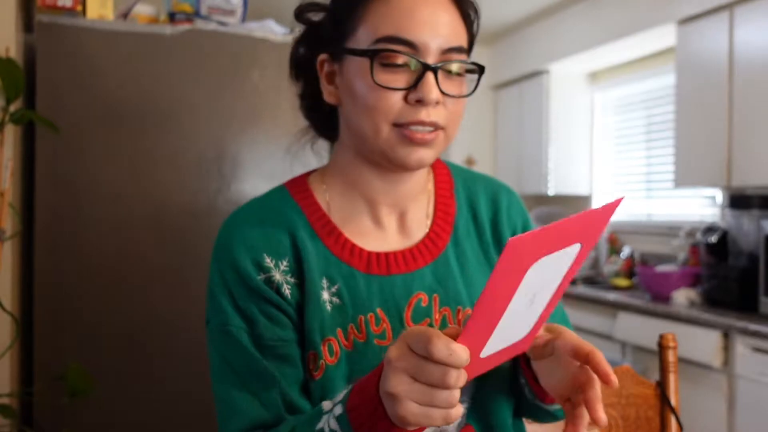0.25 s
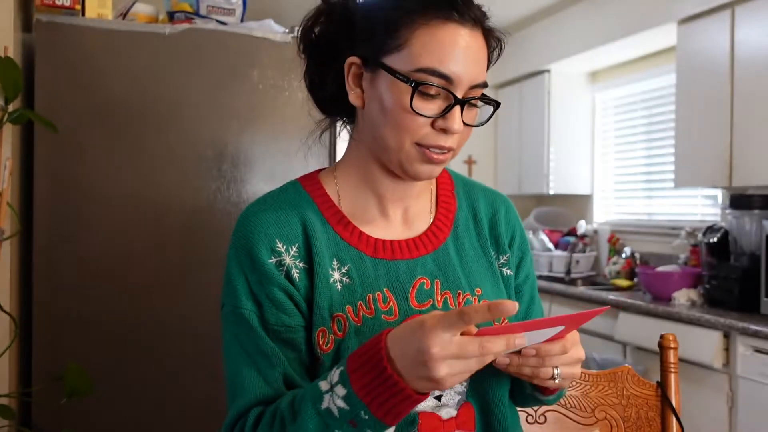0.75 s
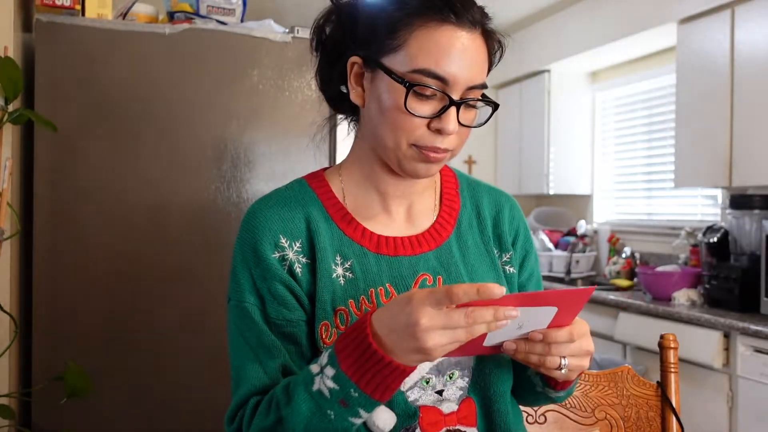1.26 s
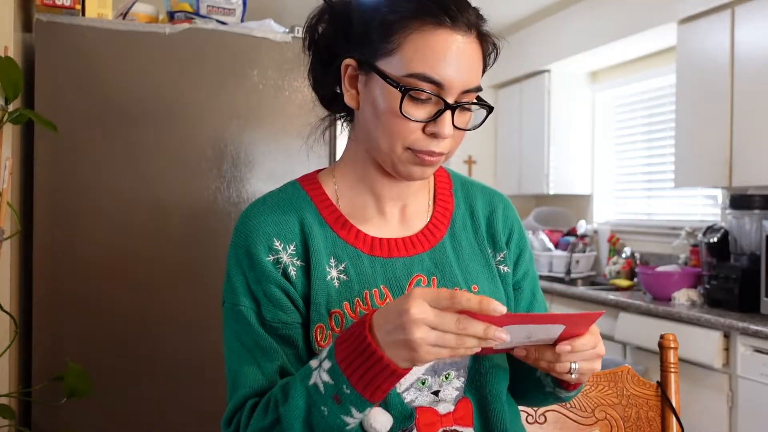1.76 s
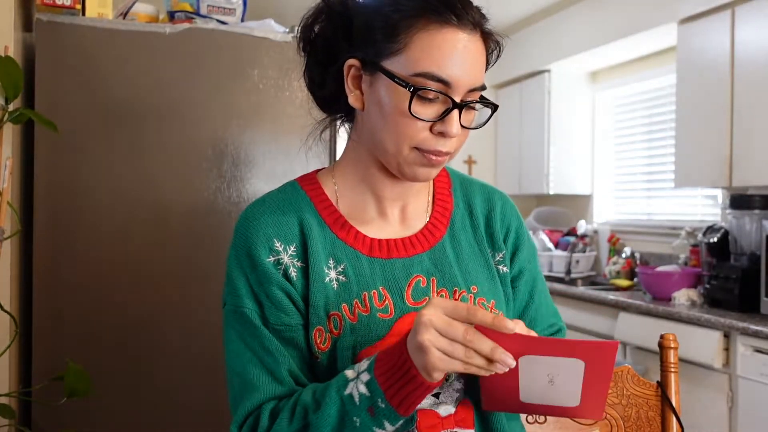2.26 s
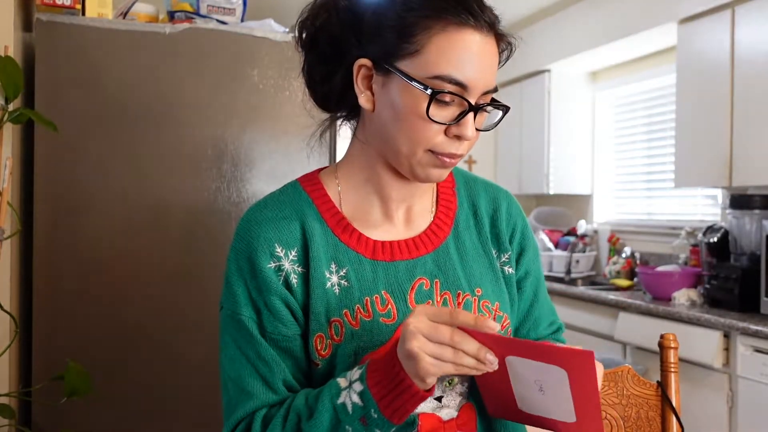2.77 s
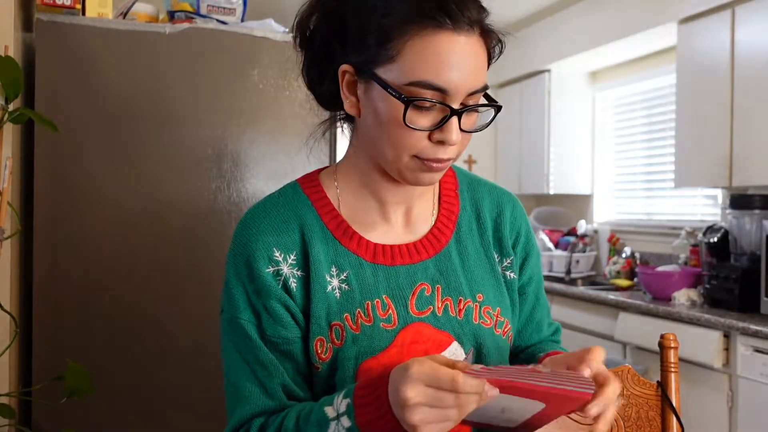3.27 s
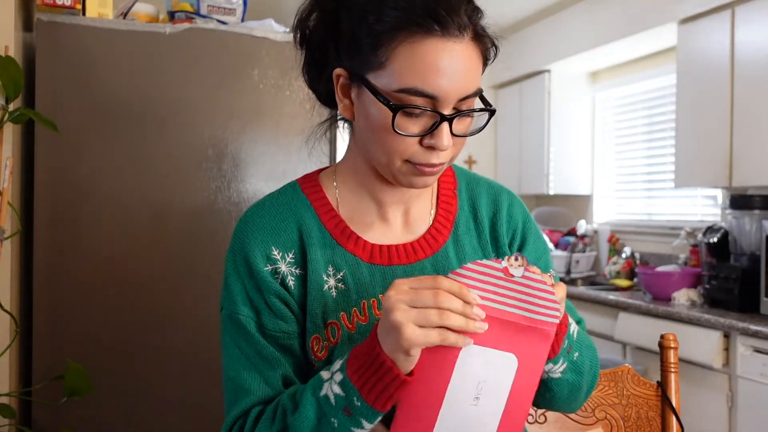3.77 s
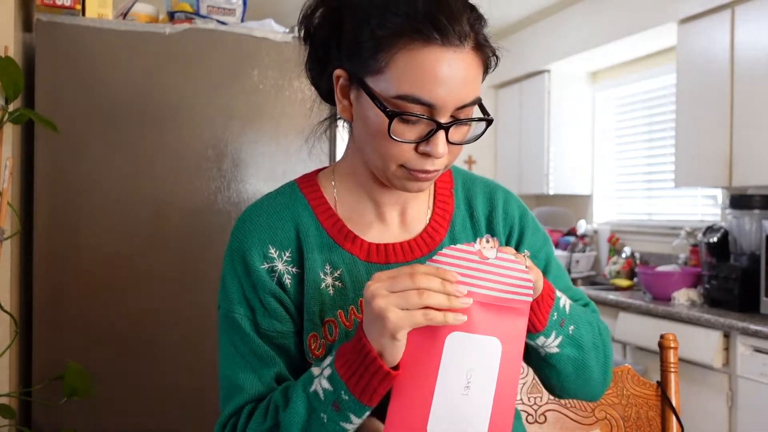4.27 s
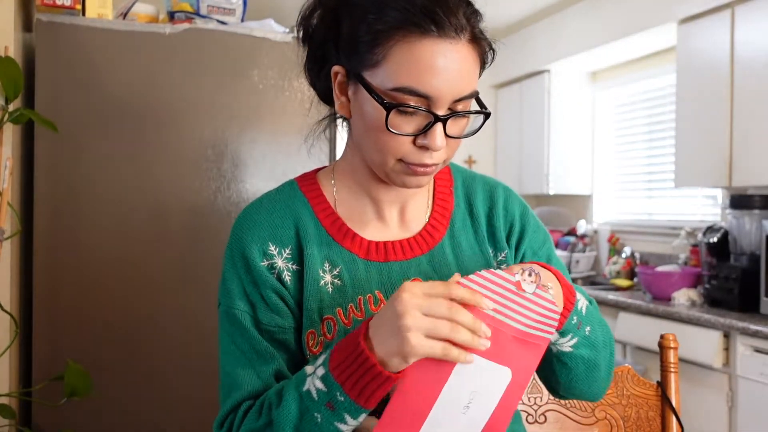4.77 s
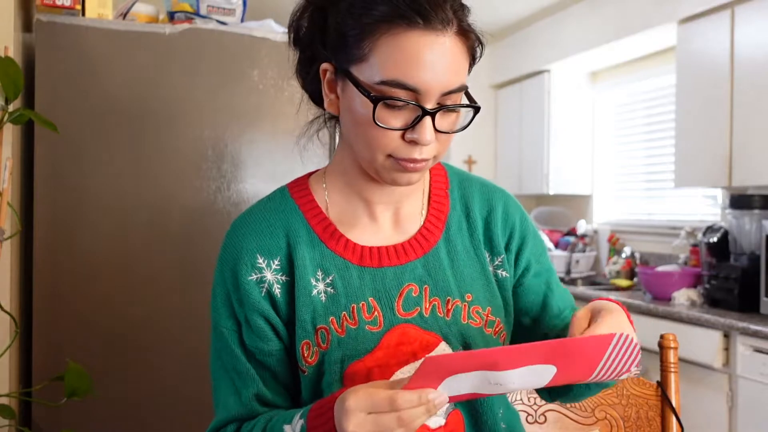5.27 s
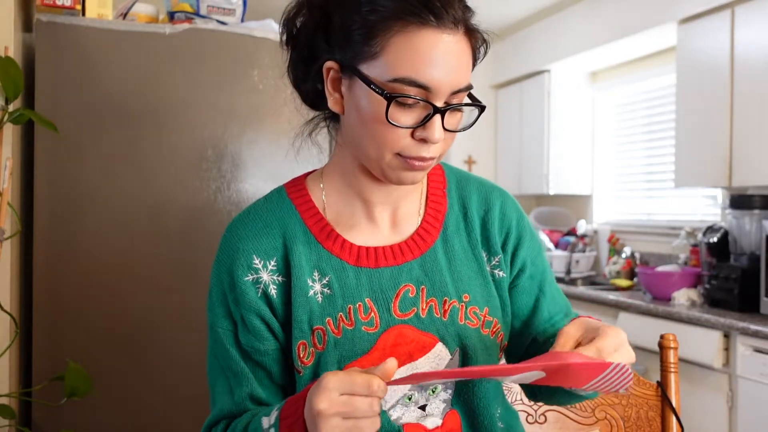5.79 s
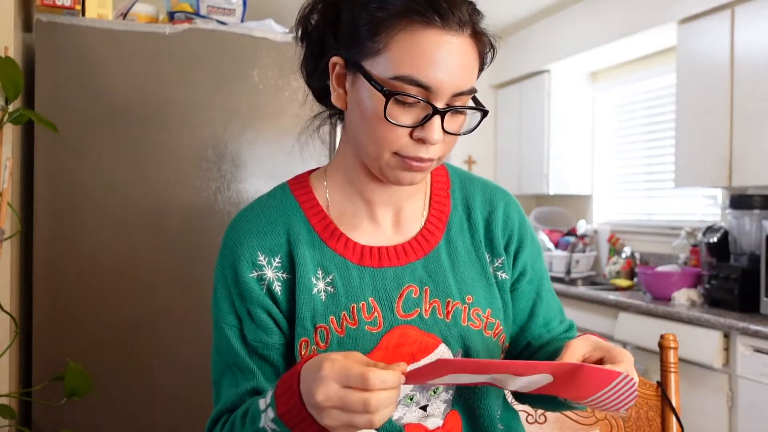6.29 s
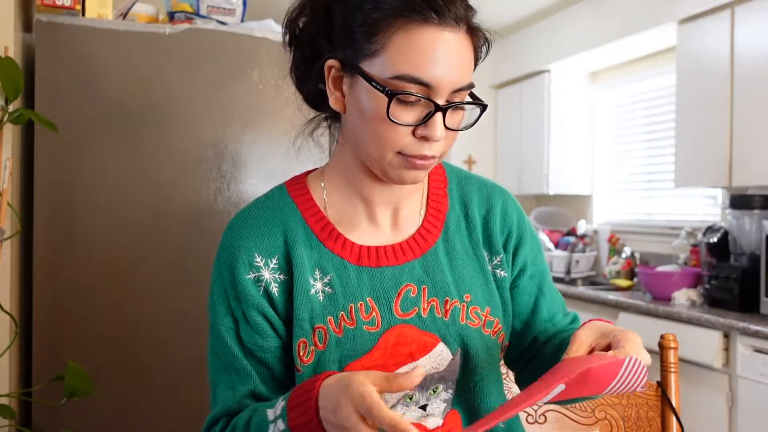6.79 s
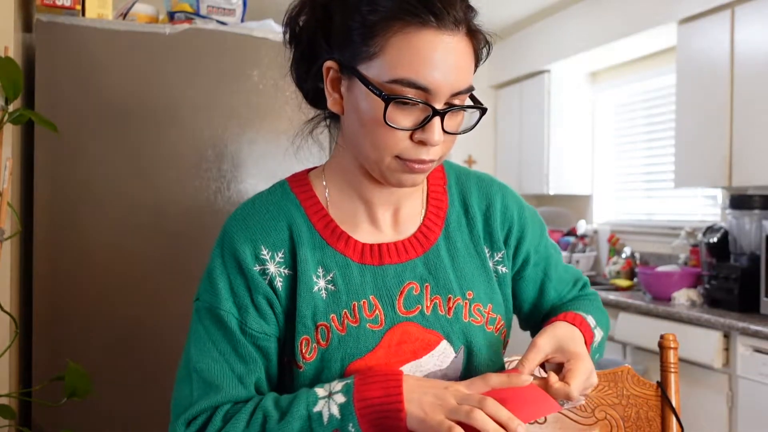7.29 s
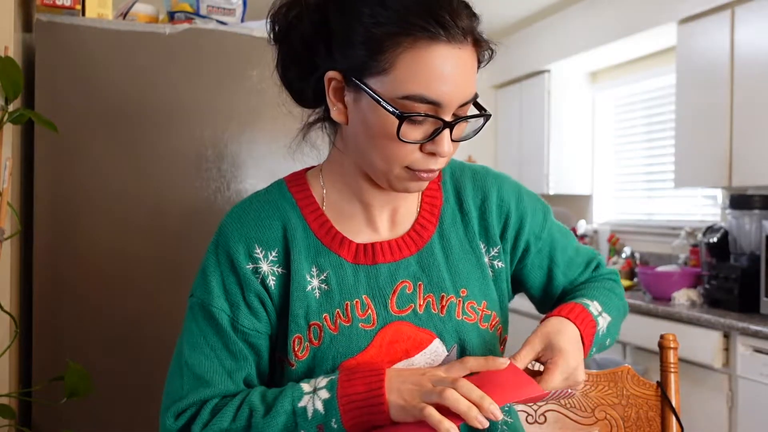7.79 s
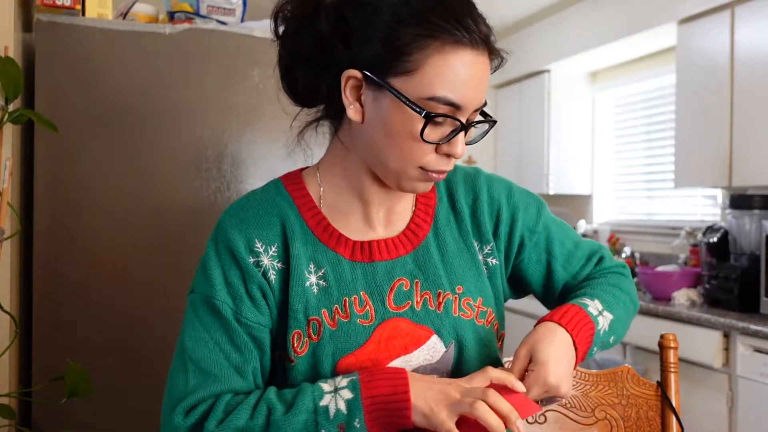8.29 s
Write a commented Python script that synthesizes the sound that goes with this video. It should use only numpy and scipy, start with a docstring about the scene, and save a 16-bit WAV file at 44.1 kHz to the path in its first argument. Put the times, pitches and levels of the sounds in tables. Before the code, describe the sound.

Close crisp paper pops and a tiny finger squeak, a burst of crackling as a flap gives way, then sparse rustles and clicks indoors.

```python
"""Sharp paper snaps, short tears, squeaks and sliding fingers, close to the microphone in a quiet kitchen.
A stiff envelope is turned over and worked open by hand: buckling panels ring as shaped noise bursts, the flap
tears in dense breaks, fingers rub with grainy noise, stick-slip squeaks are gliding tones, and soft bumps
sound the low modes. A hard surface nearby and the room answer the handling; behind it lie sleeve murmur,
still air, microphone hiss and a low drone."""
import sys
import numpy as np
from scipy import signal
from scipy.fft import rfft, irfft, next_fast_len
from scipy.io import wavfile

SR = 44100
rng = np.random.default_rng(int(sys.argv[2]) if len(sys.argv) > 2 else 0)


def to_wav(sig):
    """Store sig (one row per channel, or 1-D mono) as 16-bit WAV at the path in sys.argv[1].

    Samples outside -1..1 are clipped; the rate is SR.
    """
    pcm = np.clip(np.atleast_2d(sig), -1, 1) * 32767
    pcm = np.round(pcm).astype(np.int16)
    wavfile.write(sys.argv[1], SR, pcm.T)  # frames by channels


N = 376613   # length in samples

# All levels in the event tables are relative: each function sets its layer's place in the mix.

# Paper buckles, close to the microphone:
# start_s, level_db (body), edge_db (crisp edge against body), pitch_hz (panel), clear_db (clearness of ring)
BUCKLES = [(0.2563, -60, 12.5, 6500, 4), (0.3314, -57.5, 10, 6500, 2), (.448, -43.5, -7, 2640, -9.5),
           (0.8906, -54, -6, 1840, -7), (1.297, -56, 1, 6700, -5), (1.3897, -52.5, 2, 6340, -11),
           (1.452, -45.5, -6, 3760, -2), (1.6818, -24.5, -6.5, 4800, 2), (1.951, -31, -6, 6800, 21),
           (1.9653, -25.5, -10, 4400, -0.5), (1.9701, -24, -8.5, 4000, 2), (2.318, -36.5, -23, 3100, 2.5),
           (2.4294, -21.5, -10, 2450, -0.5), (2.5098, -27, -32, 1610, -1.5),
           (2.6191, -18.5, -14, 2870, -5.5), (2.6254, -20, -7, 5270, -1), (2.6506, -13, -10.5, 2110, 2),
           (2.661, -16, -6.5, 2710, 3), (2.6675, -25, -13, 2000, 1), (2.951, -48.5, -4, 2900, 14),
           (2.993, -41, 0, 3000, -5), (2.996, -17, -11, 2760, 4.5), (3.0177, -24.5, -3, 1840, -0.5),
           (3.2382, -36, -10.5, 4120, 2), (3.2732, -39.5, -20, 2170, -2), (3.332, -32, -20, 2110, -4),
           (3.489, -47.5, -21, 2000, -2), (3.5822, -40, -12, 1800, -5), (3.6, -37, -14, 1620, -9),
           (3.622, -40.5, -13, 1500, -2), (3.65, -51, -22, 1500, -5), (3.666, -50, -10, 1700, -14),
           (3.7222, -49, -24, 1600, 0), (3.758, -53, -24, 1500, -6), (3.8926, -23, -16.5, 2140, 2.5),
           (3.9083, -21, -19, 2420, -4), (4.271, -53, -20, 2190, -4), (4.311, -45.5, -41, 1700, 5),
           (4.372, -47, -25, 1900, -3), (4.58, -28.5, -26, 2120, 0.5), (4.6305, -34.5, -22, 2180, -5),
           (4.652, -35.5, -38, 1790, 17), (4.7, -27.5, -25, 2080, -1.5), (4.857, -44.5, -11, 2360, -4),
           (5.03, -57, 3, 3000, 0), (5.107, -45, -10, 5440, 0), (5.2105, -36.5, -16, 4370, -4),
           (5.277, -57, 7, 3500, -4), (5.71, -61.5, 9, 5000, -2), (5.8216, -28.5, -15, 2640, 3),
           (5.826, -39, -14, 5200, 8), (5.9756, -25, -16, 2530, 3.5), (5.9802, -38, -11, 4560, -6),
           (6.1455, -49, 4.5, 1570, 4), (6.2904, -51, -10, 3900, -9), (6.7742, -48.5, -9, 2460, -3),
           (6.8874, -50, -6, 1940, -8.5), (6.9811, -45.5, -7, 2680, -6), (7.168, -38.5, -31, 1910, -1),
           (7.2205, -37.5, -27, 1870, -6), (7.566, -42, -17, 1460, 0.5), (7.869, -39, -9, 2060, -1.5),
           (8.2037, -30.5, -28.5, 2250, -1), (8.2088, -38, -30, 3850, 8), (8.3817, -30, -24, 3000, -4.5)]
PANEL_HZ, PANEL_RING_S = 2290, 0.01595   # a typical panel
# smaller, higher panels sound less dull and die sooner
DULL_DB_PER_OCTAVE, RING_S_PER_OCTAVE = -7, -0.0039
# below this table level a crease rings longer: one more ring time for each span
GENTLE_BELOW_DB, GENTLE_SPAN_DB = -41, 11


def snaps(body_db=-17.0, dull_db=-10.5, crisp_db=-3.0):
    """The bent stiff sheet gives suddenly; the size of the panel sets its dull part and ring time."""
    out = np.zeros(N)
    for start_s, level, edge, hz, clear in [*BUCKLES, *ticks()]:
        octaves = np.log2(hz / PANEL_HZ)
        dull = dull_db + DULL_DB_PER_OCTAVE * octaves - clear   # a freely ringing panel thuds less
        ring_times = 1 + max(GENTLE_BELOW_DB - level, 0) / GENTLE_SPAN_DB
        t60 = ring_times * (PANEL_RING_S + RING_S_PER_OCTAVE * octaves)
        sound = buckle(dull, edge + crisp_db, clear, hz, t60)
        add(out, start_s, from_db(level + body_db) * sound)
    return out


# how clearly a panel's own pitch and its octave ring out
PANEL_DB, PANEL_OCTAVE_DB, PANEL_Q = 6, -8.5, 3.1
# a snap with a weaker edge also has a lower top
TOP_HZ, TOP_AT_CRISP_DB, CRISP_DB_PER_OCTAVE = 5700, -20, 28.5


def buckle(dull_db, crisp_db, clear_db, hz, t60):
    """A buckle rings the panel it happens in; low bending waves last longer than the crisp edge."""
    top_hz = TOP_HZ * 2 ** ((crisp_db - TOP_AT_CRISP_DB) / CRISP_DB_PER_OCTAVE)
    ring = band(flutter(t60, give_s=.001), 1300, np.clip(top_hz, 3000, 7000), order=3)
    q = PANEL_Q * from_db(clear_db / 2)
    own_pitch = from_db(PANEL_DB) * resonance(ring, hz, q)
    octave = from_db(PANEL_OCTAVE_DB) * resonance(ring, 2 * hz, q)
    body = rms_one(ring + from_db(clear_db) * (own_pitch + octave))
    low = rms_one(pocket(band(flutter(1.6 * t60, give_s=.0004), 450, 1200)))
    edge = band(flutter(t60, give_s=.0013), 6800, 15000, order=3)
    edge = rms_one(band(edge, 2000, 10000, order=1))
    return body + from_db(dull_db) * low + from_db(crisp_db) * edge


# faint creases tick at random while the hands move; levels on the scale of the buckle table
TICKS_PER_S, TICK_OVER_DRAG_DB, TICK_CRISP_DB = 3.9, -3.5, -13


def ticks():
    """Tiny buckles at random moments and pitches, their strength following the fingers' drag."""
    chance = rng.random((round(TICKS_PER_S * N / SR), 2))
    drag_s, drag_db = np.transpose(DRAG)
    rows = []
    for start_s, octaves in zip(chance[:, 0] * N / SR, chance[:, 1] - .5):
        level = np.interp(start_s, drag_s, drag_db) + TICK_OVER_DRAG_DB
        rows.append((start_s, level, TICK_CRISP_DB, PANEL_HZ * 2 ** octaves, 0))
    return rows


# The glued flap gives way in runs of tiny breaks: start_s, length_s, level_db, pitch_hz (panel)
RIPS = [(0.451, 0.015, -44.5, 4200), (2.407, 0.031, -38.5, 5500), (2.454, 0.013, -16.5, 3730),
        (2.464, 0.047, -29, 3700), (2.663, 0.0097, -15, 2200), (2.678, .025, -17.5, 3100),
        (2.9958, 0.0073, -18, 2760), (3.011, 0.0031, -20.5, 5500), (3.026, 0.0126, -49, 3020),
        (3.905, 0.0063, -22, 4200), (4.587, 0.011, -41.5, 2300), (4.702, 0.015, -34.5, 2400),
        (5.208, 0.018, -44, 3600)]
# Colour of the tearing: frequency_hz, gain_db
RIP_COLOUR = [(71, -54), (120, -106), (200, -5.5), (272, 4), (503, -20), (592, 9), (968, -19), (1680, 11.5),
              (2020, 5.5), (2930, 10), (5630, 9), (14700, -9.5), (16000, -22)]
RIP_PANEL_DB = 0.5   # how much the pulled panel rings at its own pitch


def rips(level_db=-9.5):
    """Dense breaks of glue and fibre ring the pulled panel for as long as each pull lasts."""
    out = np.zeros(N)
    breaks = grains(per_s=1600, spread_db=4.0)
    crackle = signal.fftconvolve(breaks, flutter(t60=0.0017, give_s=.0001))[:N]   # each break rings briefly
    crackle = coloured(crackle, RIP_COLOUR)
    for start_s, length_s, db, hz in RIPS:
        pull = crackle[int(start_s * SR):int((start_s + length_s) * SR)]
        pull = rms_one(pull + from_db(RIP_PANEL_DB) * resonance(pull, hz, q=4))
        add(out, start_s, from_db(db + level_db) * pull * signal.windows.tukey(len(pull), .19))
    return out


# How hard the fingers drag over the paper, as a curve: time_s, level_db (rustle)
DRAG = [(0.0, -68.5), (0.3, -62), (0.6, -58.5), (0.82, -60.5), (0.97, -66), (1.26, -68), (1.58, -60),
        (1.8, -60.5), (1.92, -48), (2.11, -43), (2.3, -56), (2.43, -47.5), (2.64, -43.5), (2.83, -58),
        (3.23, -48.5), (3.46, -58.5), (3.7, -53.5), (3.87, -52.5), (4.1, -56.5), (4.2, -55.5), (4.42, -57),
        (4.7, -47.5), (4.9, -56.5), (5.08, -56.5), (5.33, -53), (5.5, -60.5), (5.66, -57), (5.79, -59.5),
        (6.26, -64.5), (6.4, -61), (6.5, -69.5), (6.64, -59.5), (6.74, -66), (6.86, -54), (6.96, -61.5),
        (7.01, -53.5), (7.09, -58), (7.25, -50.5), (7.32, -51), (7.49, -58), (7.68, -59), (7.83, -49.5),
        (8.08, -54.5), (8.3, -53), (8.54, -54.5)]
# A finger pushes in under the flap and rubs inside the pocket: start_s, length_s, level_db
PUSHES = [(3.1, 0.063, -49.5), (3.6, 0.09, -47.5), (3.785, 0.074, -46), (4.365, 0.096, -50),
          (4.45, 0.107, -54), (4.54, 0.23, -46), (4.655, 0.038, -46.5)]
# Colour of skin sliding on paper: frequency_hz, gain_db
SLIDE_COLOUR = [(280, -45), (480, -4.5), (598, -4.5), (745, -5.5), (1090, -6.5), (1260, -8), (1930, 2),
                (4400, 2.5), (9160, -4), (13800, -16), (16000, -51)]
USUAL_DRAG_DB, PRESSURE_WAVER_DB = -54.5, 1.8
RUB_FOLLOWS, HISS_FOLLOWS = 0.41, 0.88   # share of the drag's swing that the hollow rub and the hiss take
PUSH_RUB_DB, PUSH_RUSTLE_DB = -8, -20   # dull rub and rustle of a push, relative to its level


def sliding(rub_db=-63.0, rustle_db=-3.0, hiss_db=-67.0):
    """Skin drags over the paper's grain with wavering pressure, heard as diffuse stereo friction."""
    drag, = in_time(DRAG)
    effort = drag - USUAL_DRAG_DB
    push = swells(PUSHES, fade_share=0.25)
    rub = np.hypot(from_db(rub_db + RUB_FOLLOWS * effort), from_db(PUSH_RUB_DB) * push)
    rustle = np.hypot(from_db(rustle_db + drag), from_db(PUSH_RUSTLE_DB) * push)
    hiss = from_db(hiss_db + HISS_FOLLOWS * effort)
    pair = [grains(per_s=9000, spread_db=3.0) for _ in range(2)]
    friction = coloured(two_ports(pair), SLIDE_COLOUR)
    low = rub * rms_one(pocket(band(friction, 450, 1400, order=3)))
    middle = rustle * rms_one(pocket(band(friction, 1400, 6500, order=3)))
    high = hiss * rms_one(band(friction, 6500, 16000, order=3))
    return (low + middle + high) * from_db(PRESSURE_WAVER_DB * drift(23))


# Resonances of the pocket held open by the finger: frequency_hz, width_hz (sets Q), level_db
PUSH_RING = [(650, 110, -3.5), (1810, 200, -6)]


def pushes(level_db=-2.5, catch_db=0.5):
    """A finger inside the pocket catches on the paper in small grains and sounds its hollow."""
    friction = grains(per_s=400, spread_db=4.0)
    hollow = np.zeros(N)
    for hz, width, db in PUSH_RING:
        q = hz / width / 2
        hollow += from_db(db) * rms_one(resonance(resonance(friction, hz, q), hz, q))
    return swells(PUSHES, fade_share=0.14) * from_db(level_db + catch_db * drift(25)) * hollow


# A finger sticks and slips along the flap:
# start_s, length_s, level_db, first_hz, last_hz (pitch before shaking), roughness (0-1)
SQUEAKS = [(0.51, 0.14, -60, 1603, 1597, 0.8), (0.654, 0.23, -64, 1623, 1665, 0.9),
           (1.94, 0.029, -30, 1636, 1617, 0.05), (1.995, 0.024, -39.5, 1530, 1616, 0.2),
           (2.011, 0.023, -42, 1750, 1760, 0.3), (2.024, 0.014, -36, 1554, 1595, 0.2),
           (2.037, 0.012, -32, 1860, 2120, 0.45), (2.052, 0.048, -38, 1696, 1750, 0.78),
           (2.095, 0.0184, -28.5, 1770, 1902, 0.05), (2.1, 0.0297, -30, 1926, 1863, 0.08),
           (2.126, .056, -29.5, 1809, 1685, 0.5), (2.177, 0.014, -25, 1710, 1780, 0.23),
           (2.19, 0.024, -31, 2033, 1773, 0.6)]
# Partials of the squeak: multiple of the pitch, clean_db, rough_db (added in proportion to roughness)
OVERTONES = [(1, 13, 0.5), (2, 1, -0.5), (3, -12.5, 11), (4, -11.5, -20)]
# The flap favours some overtones: frequency_hz, gain_db
SQUEAK_COLOUR = [(1800, -2), (2600, -2), (3270, 4), (3500, 3.5), (3800, 6), (4300, 8), (5200, 8.5),
                 (6000, -15), (6600, -2.5)]
SQUEAK_EDGE_S = 0.0043   # time to catch and to let go


def squeak(level_db=-4.0, jitter=0.054, shake_db=5.0, smear=0.8):
    """Stick-slip tones glide; an unsteady grip shakes pitch and strength and smears the high overtones."""
    out = np.zeros(N)
    waver, shake, slip = drift(200), np.tanh(drift(130)), drift(350)
    for start_s, length_s, db, first_hz, last_hz, rough in SQUEAKS:
        t = np.arange(int(length_s * SR)) / SR
        now = int(start_s * SR) + np.arange(len(t))
        hz = np.linspace(first_hz, last_hz, len(t)) * (1 + jitter * rough * waver[now])
        phase = 2 * np.pi * np.cumsum(hz) / SR
        blur = smear * rough * slip[now]   # phase in radians
        tone = np.zeros(len(t))
        for k, clean_db, rough_db in OVERTONES:
            tone += from_db(clean_db + rough * rough_db) * np.sin(k * phase + (k - 1) * blur)
        grip = np.minimum(np.minimum(t, length_s - t) / SQUEAK_EDGE_S, 1)
        level = from_db(db + level_db + shake_db * rough * shake[now])
        add(out, start_s, grip * rms_one(tone) * level)
    return coloured(out, SQUEAK_COLOUR)


# Short quick strokes of a fingertip: start_s, length_s, level_db, centre_hz
SWISHES = [(0.075, 0.084, -55, 2900), (0.367, 0.022, -56, 2390), (0.505, 0.13, -55, 6960),
           (0.659, 0.13, -55, 5760), (0.873, 0.084, -59.5, 6000), (0.986, 0.13, -58.5, 5640),
           (1.42, 0.032, -54, 2350), (1.63, 0.088, -52.5, 4770), (3.774, 0.037, -42.5, 2210),
           (4.142, 0.036, -53, 6000), (4.237, 0.025, -66, 3000), (4.34, 0.034, -48.5, 2900),
           (4.521, 0.072, -46, 2660), (4.634, 0.061, -38.5, 2580), (4.776, 0.079, -49.5, 2260),
           (4.984, 0.053, -54.5, 3000), (5.095, 0.13, -52, 5650), (5.162, 0.061, -47, 3000),
           (5.557, 0.022, -50, 3220), (5.629, 0.07, -54, 2510), (6.2, 0.024, -75, 2480),
           (6.53, 0.029, -55.5, 2840), (6.825, 0.021, -52, 2000), (6.968, 0.17, -53.5, 7500),
           (7.097, 0.13, -52.5, 5030), (7.191, 0.021, -39, 2500), (7.347, 0.027, -46.5, 2550),
           (7.511, 0.061, -49, 4550), (7.719, 0.072, -43, 3430), (7.866, 0.16, -47.5, 3670),
           (8.085, 0.052, -54.5, 4500)]


def swishes(level_db=-5.5, span=1.86):
    """A stroke over the paper's grain swells and fades, its brightness set by its own band of friction."""
    out = np.zeros(N)
    friction = grains(per_s=7300, spread_db=6.5)
    for start_s, length_s, db, hz in SWISHES:
        stroke = friction[int(start_s * SR):int((start_s + length_s) * SR)]
        stroke = rms_one(band(stroke, hz / span, hz * span))
        add(out, start_s, from_db(db + level_db) * stroke * signal.windows.tukey(len(stroke), .8))
    return out


# Fingertips and palm bump the envelope: start_s, level_db (peak, before the pocket rings), pitch_hz
BUMPS = [(.215, -45, 403), (.245, -52, 427), (.268, -49, 442), (.785, -59, 141), (2.462, -40, 250),
         (2.464, -25.5, 633), (2.51, -33.5, 634), (2.652, -29, 500), (2.655, -43, 230), (3.019, -33.5, 524),
         (3.333, -35.5, 450), (3.491, -41, 637), (3.593, -28, 530), (3.622, -34, 1000), (3.722, -29, 880),
         (3.795, -32, 845), (3.8785, -34, 1300), (3.894, -24.5, 614), (3.909, -28, 710),
         (4.312, -34.5, 660), (4.382, -43, 650), (4.413, -45, 645), (4.664, -35.5, 640), (7.192, -38, 258),
         (7.193, -33.5, 586), (7.221, -37, 630), (8.205, -49, 231)]
BUMP_CYCLES = 17.6   # cycles of its pitch that set each bump's fade time


def bumps(level_db=-2.0, give_s=0.00032):
    """Soft contacts move the whole envelope, so only its low modes sound."""
    out = np.zeros(N)
    for start_s, db, hz in BUMPS:
        thud = band(flutter(BUMP_CYCLES / hz, give_s), hz / 1.42, hz * 1.59, order=3)
        add(out, start_s, from_db(db + level_db) * thud / np.abs(thud).max())
    return pocket(out)


# Air in the pocket between the two sheets: frequency_hz, width_hz, level_db (added)
POCKET = [(638, 56, -1.5), (1236, 77, -1.5), (1800, 350, -18)]


def pocket(x):
    """The hollow envelope adds its resonances to whatever shakes it."""
    return x + sum(from_db(db) * resonance(x, hz, hz / width) for hz, width, db in POCKET)


# Faint thin whistles: start_s, length_s, pitch_hz (centre), level_db
WHISTLES = [(0.252, 0.024, 10600, -65), (1.288, 0.017, 10600, -61), (1.38, 0.015, 10600, -64),
            (3.144, 0.045, 6450, -57), (3.53, 0.07, 6550, -63), (4.134, 0.24, 12300, -67),
            (4.222, 0.11, 4920, -59), (4.17, 0.19, 10340, -70), (5.235, 0.073, 6500, -56)]


def whistles(level_db=0.0, waver_hz=70, shake_db=5.0):
    """Thin sine tones swell and fade while their pitch and strength waver."""
    out = np.zeros(N)
    waver, shake = waver_hz * drift(300), from_db(shake_db * drift(90))
    for start_s, length_s, hz, db in WHISTLES:
        now = slice(int(start_s * SR), int((start_s + length_s) * SR))
        phase = 2 * np.pi * np.cumsum(hz + waver[now]) / SR
        tone = np.sin(phase) * signal.windows.tukey(len(phase), .5)
        add(out, start_s, from_db(db + level_db) * shake[now] * tone)
    return out


# The arms shift in their sleeves: start_s, length_s, level_db
ARM_MOVES = [(2.42, 0.36, -59), (3.52, 0.44, -54), (4.3, 0.56, -55), (5.7, 0.38, -54), (6.1, 0.25, -57.5),
             (7.18, 0.1, -39.5), (7.3, 0.72, -59)]


def sleeves(level_db=-8.0, lumpy_db=0.5):
    """Wool and arms give a lumpy, muffled murmur of low noise."""
    moving = swells(ARM_MOVES, fade_share=0.31)
    lumps = from_db(level_db + lumpy_db * np.tanh(drift(5.9)))
    return moving * lumps * rms_one(band(rng.standard_normal(N), 116.0, 346, order=3))


# How well the tilted sheet throws sound at the nearest hard surface and into the room, as curves:
# time_s, echo_db, treble_echo_db, room_db
FACING = [(0, -1.5, -12, -4.5), (1.68, -2, 7.5, -1), (1.97, -15, 4, -2), (2.43, 0.5, 10, 1),
          (2.65, -8, 1.5, -4.5), (3.0, -3.5, 4, -0.5), (3.9, -4.5, -20, -6), (5.82, -3.5, -32, -2),
          (5.98, -6, 0, -4), (8.2, 2, -31, -1.5), (8.4, -3, 1, -4.5)]
# Colour of the nearest echo: frequency_hz, gain_db
NEAR_ECHO_COLOUR = [(300, -13), (2500, -0.5), (10000, -5.5)]
# Later hard echoes: delay_s, level_db
ECHOES = [(.0079, -12.5), (0.015, -6.5)]
# A standing wave between the walls: frequency_hz, width_hz, level_db (added)
ROOM_MODE = (218, 8.5, 14.6)
NEAR_ECHO_S = .0053   # mean delay of the nearest surface, a path about 1.8 m longer than the direct one
BEAM_HZ = 5840   # above this the sheet throws its sound in a beam
MOVE_S = 2.255   # one cycle of the wandering hands, in which the room's answer changes


def kitchen(x, count=3):
    """Direct sound, a few hard echoes, a standing wave and a tail that changes as the hands move."""
    echo_db, beam_db, room_db = in_time(FACING)
    # the nearest echo follows the tilt and the small sway of the envelope
    lag = np.round(SR * NEAR_ECHO_S * (1 + .012 * drift(.5)))
    near = np.interp(np.arange(N) - lag, np.arange(N), coloured(x, NEAR_ECHO_COLOUR))
    beam = signal.sosfiltfilt(signal.butter(2, BEAM_HZ, "high", fs=SR, output="sos"), near)
    echo = from_db(echo_db) * (near - beam) + from_db(beam_db) * beam
    hz, width, db = ROOM_MODE
    out = x + echo + from_db(db) * resonance(x, hz, hz / width)
    thrown = x * from_db(room_db)
    for delay_s, db in ECHOES:
        add(out, delay_s, from_db(db) * thrown)
    # different tails take turns, overlapping at constant power
    turns = np.arange(N) / SR / MOVE_S - np.arange(count)[:, None] / count
    places = np.maximum(np.cos(2 * np.pi * turns), 0)
    for share in places / np.linalg.norm(places, axis=0):
        tail = room_tail(build_s=0.0013, tail_db=1.42)
        out = out + signal.fftconvolve((share * thrown)[None], tail, axes=1)[:, :N]
    return out


# Fade time of the room by band: frequency_hz, t60_s
ROOM_T60 = [(150, 1), (530, 0.49), (1400, 0.35), (3700, 0.4), (9700, 0.41), (15000, 0.37)]
# Colour of the room's tail: frequency_hz, gain_db
ROOM_COLOUR = [(150, 2.5), (530, 0), (1400, 4), (4500, 4.5), (9000, 7), (15000, 0.5)]


def room_tail(build_s, tail_db):
    """A diffuse stereo tail that builds up quickly and dies band by band."""
    t = np.arange(SR // 2) / SR
    white = [two_ports(pair) for pair in rng.standard_normal((2, 2, len(t)))]
    tail = np.zeros((2, len(t)))
    edges = np.geomspace(70, 17000, 12)
    for k, (low, high) in enumerate(zip(edges, edges[1:])):
        hz = np.sqrt(low * high)
        fade_db = at_hz(ROOM_COLOUR, hz) - 60 * t / at_hz(ROOM_T60, hz)
        tail += band(white[k % 2], low, high) * from_db(fade_db)
    return from_db(tail_db) * rms_one(tail * (1 - np.exp(-t / build_s))) / np.sqrt(len(t))


# Colour of still air and microphone hiss: frequency_hz, gain_db
AIR = [(18, -72), (30, -32), (153, -5), (215, -4.5), (280, -8.5), (355, 2), (512, -7.5), (740, -27),
       (889, -6.5), (1160, -34), (1630, -18), (5310, -30.5), (11100, -29.5), (14800, -33), (16000, -33)]
# Low drone of the kitchen: pitch_hz (mean), level_db
HUM = [(215, -75), (360, -71)]


def room_tone(air_db=-61.5, hum_waver=0.01103):
    """Still air and microphone hiss as coloured noise, with a low drone of wavering sines."""
    air = rms_one(two_ports(coloured(rng.standard_normal((2, N)), AIR)))
    hum = np.zeros(N)
    for hz, db in HUM:
        phase = 2 * np.pi * np.cumsum(hz * (1 + hum_waver * drift(10.0))) / SR
        hum += from_db(db) * rms_one(np.sin(phase))
    return from_db(air_db) * air + hum


# Diffuse sound at the microphone pair: frequency_hz, side_db (against mid)
PORT_SIDE = [(100, -10.5), (500, -7.5), (1200, -4), (4000, -7), (9000, -4.5), (14000, -11.5)]


def two_ports(pair):
    """Two close capsules hear nearly the same diffuse sound, most alike in the bass and at the very top."""
    return pair[0] + coloured(pair[1], PORT_SIDE) * np.array([[1], [-1]])


def flutter(t60, give_s, count=3):
    """Crowded modes of a struck sheet: an even spectrum that swells as the paper gives and dies fast."""
    t = np.arange(SR // 10) / SR
    fade = from_db(-60 * t / max(t60, .001))
    shape = fade * (1 - np.exp(-t / give_s))
    sound = rng.standard_normal(len(t)) * shape
    for _ in range(count):   # flatten the spectrum, then shape the burst again
        spectrum = rfft(sound)
        sound = irfft(spectrum / (np.abs(spectrum) + 1e-12), len(t)) * shape ** (1 / count)
    return sound


def grains(per_s, spread_db):
    """Fibres let go at random moments, some harder than the rest, up to twice the spread either way."""
    sizes = from_db(spread_db * rng.uniform(-2, 2, N)) * rng.choice([-1, 1], N)
    return rms_one((rng.random(N) < per_s / SR) * sizes)


def swells(rows, fade_share):
    """Gain over time of gestures (start_s, length_s, level_db) that each swell, hold and fade."""
    out = np.zeros(N)
    for start_s, length_s, db in rows:
        add(out, start_s, from_db(db) * signal.windows.tukey(max(int(length_s * SR), 2), fade_share))
    return out


def drift(rate):
    """Smooth chance with spread 1 that changes about rate times a second."""
    r = np.exp(-20 * np.pi * rate / SR)   # computed at a tenth of the sample rate
    slow = signal.lfilter([1], [1, -2 * r, r * r], rng.standard_normal(N // 5))
    slow = slow[-(N // 10 + 2):]   # skip the filter's start
    return np.interp(np.arange(N) / 10, np.arange(len(slow)), rms_one(slow))


def resonance(x, hz, q):
    """One resonance with gain 1 on its top."""
    return signal.lfilter(*signal.iirpeak(hz, q, fs=SR), x)


def band(x, low_hz, high_hz, order=2):
    """Causal band-pass."""
    edges = [low_hz, min(high_hz, SR * .49)]
    return signal.sosfilt(signal.butter(order, edges, "band", fs=SR, output="sos"), x)


def coloured(x, spectrum):
    """Give a sound the spectrum's colour."""
    size = next_fast_len(x.shape[-1])
    gain = from_db(at_hz(spectrum, np.fft.rfftfreq(size, 1 / SR)))
    return irfft(rfft(x, size) * gain, size)[..., :x.shape[-1]]


def at_hz(points, hz):
    """Read a spectrum on a log-frequency axis."""
    known_hz, values = np.transpose(points)
    return np.interp(np.log(np.maximum(hz, 1)), np.log(known_hz), values)


def in_time(rows):
    """The columns of a curve at every sample."""
    time_s, *columns = np.transpose(rows)
    return [np.interp(np.arange(N) / SR, time_s, column) for column in columns]


def add(out, start_s, sound):
    """Mix a sound in at its start time."""
    start = max(round(start_s * SR), 0)
    out[start:start + len(sound)] += sound[:max(N - start, 0)]


def from_db(db):
    """Decibels to gain."""
    return 10 ** (np.asarray(db) / 20)


def rms_one(x):
    """Scale to unit power."""
    return x / np.sqrt(np.mean(x ** 2) + 1e-20)


# Stereo balance of the envelope: frequency_hz, balance_db (left against right)
BALANCE_DB = [(100, 0.5), (500, 0), (1200, -1), (2300, -1.6), (4300, -3), (8000, -3.5), (14000, 0.5)]


def scene():
    """The envelope is held a little to the right of the microphone, in front of the quiet kitchen."""
    handling = snaps() + rips() + bumps() + swishes() + squeak() + whistles()
    left, right = kitchen(handling) + sliding() + pushes()
    left = coloured(left, [(hz, db / 2) for hz, db in BALANCE_DB])
    right = coloured(right, [(hz, -db / 2) for hz, db in BALANCE_DB])
    return np.array([left, right]) + sleeves() + room_tone()


def record(dry, rumble_hz=70, cutoff_hz=16100):
    """The microphone sheds rumble; a steep low-pass cuts the top."""
    clean = signal.sosfilt(signal.butter(2, rumble_hz, "high", fs=SR, output="sos"), dry)
    return signal.sosfilt(signal.ellip(10, .2, 80, cutoff_hz, fs=SR, output="sos"), clean)


dry = scene()
out = record(dry)
to_wav(out)
```